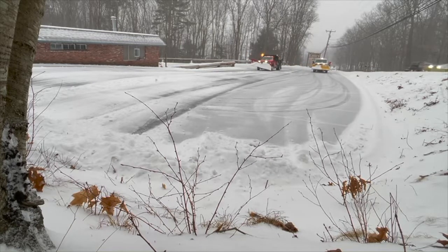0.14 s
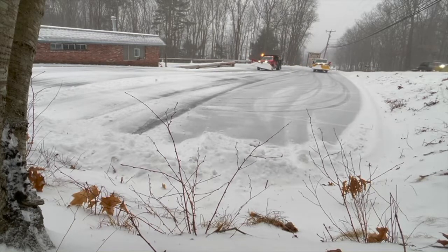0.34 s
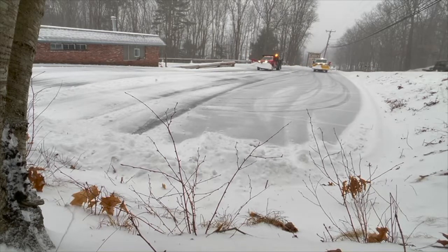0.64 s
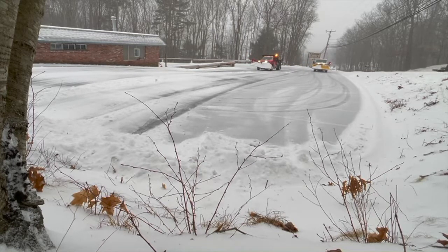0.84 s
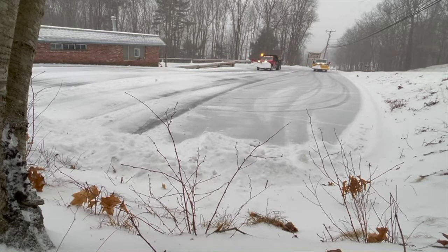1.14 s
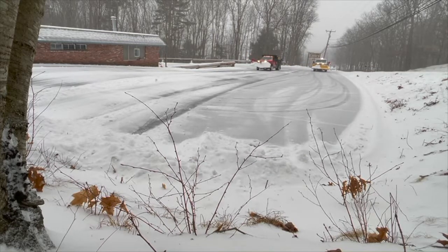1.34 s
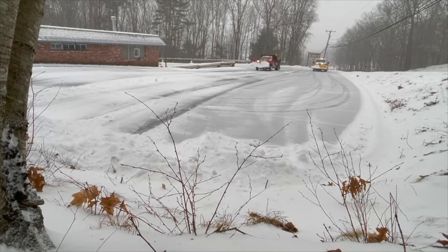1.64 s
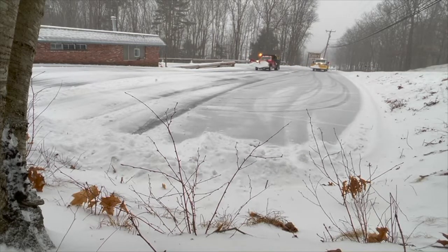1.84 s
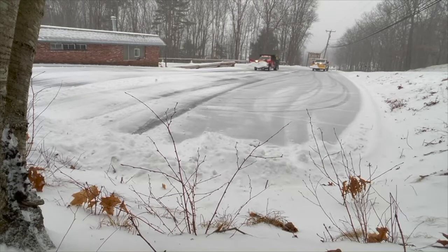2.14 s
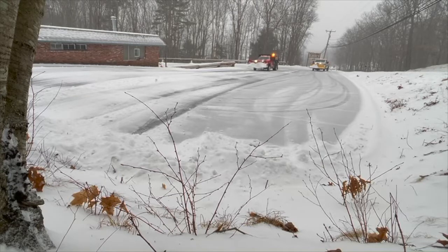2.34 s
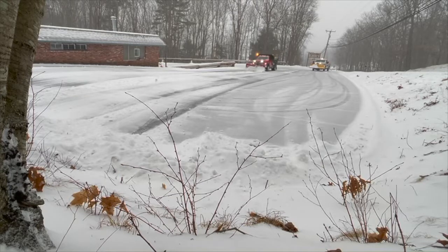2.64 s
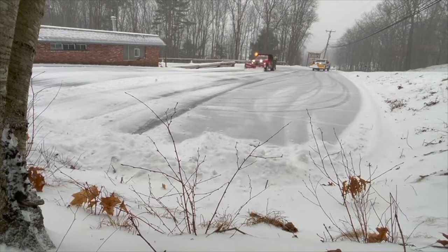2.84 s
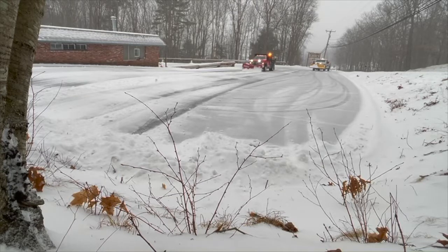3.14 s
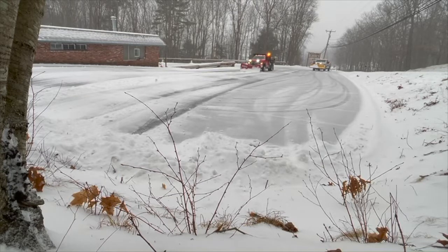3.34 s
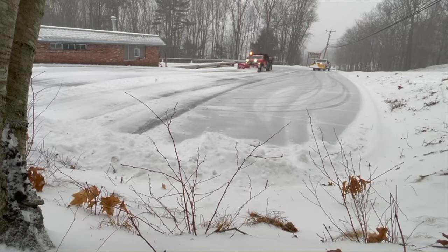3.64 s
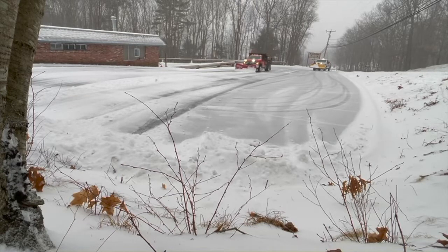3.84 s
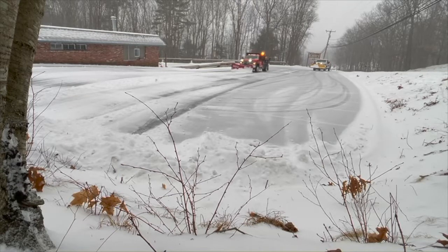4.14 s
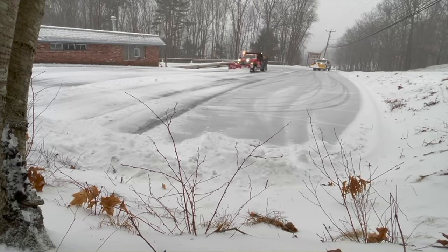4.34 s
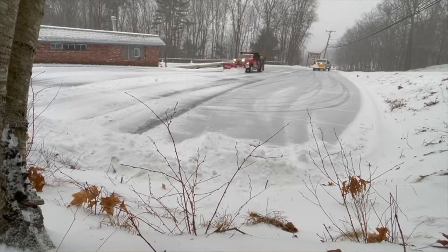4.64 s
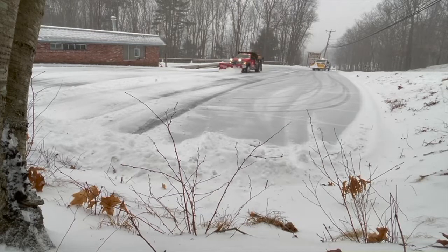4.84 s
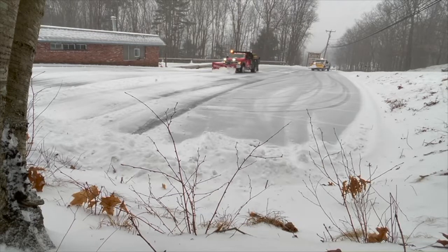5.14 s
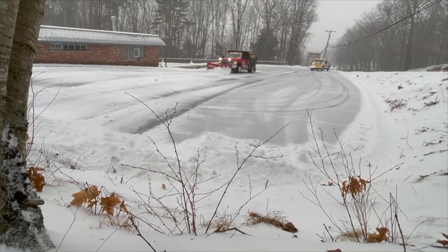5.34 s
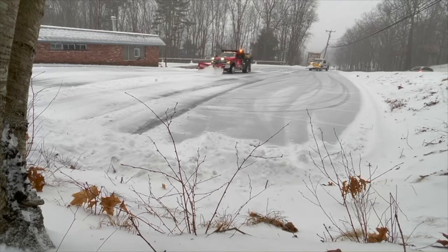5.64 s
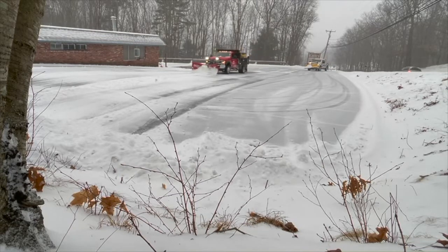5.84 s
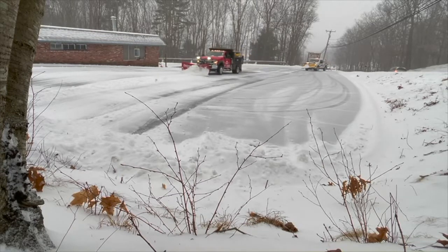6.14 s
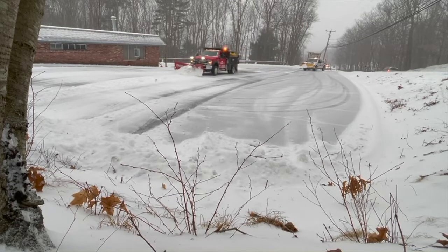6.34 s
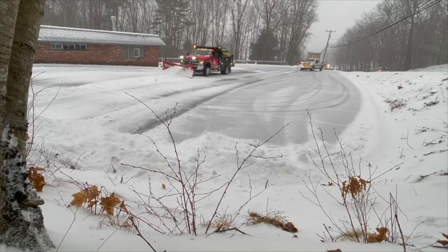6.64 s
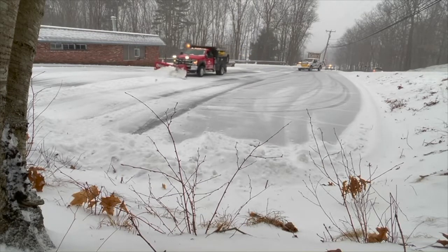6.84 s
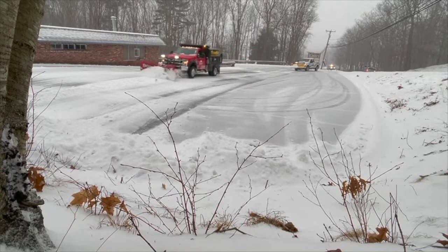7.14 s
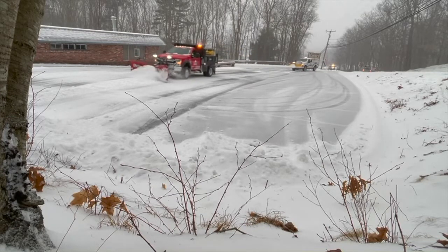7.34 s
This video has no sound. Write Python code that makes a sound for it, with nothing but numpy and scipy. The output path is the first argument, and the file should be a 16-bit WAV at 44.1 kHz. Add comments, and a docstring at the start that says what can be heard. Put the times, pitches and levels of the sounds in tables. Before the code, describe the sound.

Fine icy hiss surrounds the microphone, with irregular crisp ticks left and right and a few dull taps. A big diesel throbs from the start, strongest before a heavy steel bang and bounce just under three seconds in. Then the engine fades slowly into low road rumble and slush wash, as a slowing car's falling hum joins gritty, splashing surges near the end.

```python
"""A stereo microphone stands on a snowy lot with sleet hissing all round and pellets ticking close by.
From the start a plow truck's eight-cylinder diesel drones, swells and sinks: engine-order lines and a wall echo.
A faint hydraulic whine glides by as the blade begins to drag, as noise through ground chatter resonances.
Then the blade bangs down in a burst of blows that ring its modes and draw a short tail from the lot.
Late on, a car slows on the slushy road: a sinking engine line, surges of spray noise, then scraping swells."""
import sys
import numpy as np
from scipy import signal
from scipy.fft import rfft, irfft, next_fast_len
from scipy.io import wavfile
from scipy.ndimage import uniform_filter1d

SR = 44100
rng = np.random.default_rng(int(sys.argv[2]) if len(sys.argv) > 2 else 0)


def int16_out(signal):
    """Quantize to a 16-bit WAV file."""
    q = np.round(np.clip(np.atleast_2d(signal).T, -1, 1) * 32767)
    wavfile.write(sys.argv[1], SR, q.astype(np.int16))


N = 329868
TIME = np.arange(N) / SR

# low rumble of exhausts and vehicle bodies, shared by road and car: [f/Hz, relative level/dB per Hz]
RUMBLE_SPECTRUM = [(20, -26), (30, -20), (42, -18), (70, 2.5), (110, -3.5), (150, -7.5), (200, -7),
                   (260, -16.5), (330, -27.5)]
RUMBLE_WIDE_DB = -14  # opposite share re the common share


def undb(db):
    """Decibels to an amplitude factor."""
    return 10 ** (np.asarray(db) / 20)


def unit(x):
    """Scale to rms 1."""
    return x / np.sqrt(np.mean(x ** 2))


def curves(table):
    """Columns of a table, joined by straight lines in time."""
    s, *columns = np.transpose(table)
    return [np.interp(TIME, s, column) for column in columns]


def walk(rate):
    """Random levels held 1 / rate s and slewed twice; spread near 1."""
    hold = int(SR / rate)
    steps = np.repeat(rng.standard_normal(N // hold + 1), hold)
    return 1.38 * uniform_filter1d(uniform_filter1d(steps, hold), hold)[:N]


def pan(x, db):
    """Place a sound between the ports; db is left minus right."""
    return np.array([x * undb(db / 2), x * undb(-db / 2)])


def wide(common, opposite):
    """Left and right from a part alike at both ports and a part of opposite sign."""
    return np.array([common + opposite, common - opposite])


def ring(x, hz, t60):
    """One decaying mode, struck by x; it falls 60 dB in t60 s."""
    pole = np.exp(2j * np.pi * hz / SR - np.log(1000) / (t60 * SR))
    return signal.lfilter([1], [1, -pole], x).imag


def tone(hz, wobble_db, rate, turn=0.):
    """A sine of rms near 1 whose strength and timing waver."""
    strength = undb(wobble_db * walk(rate))
    turns = np.cumsum(hz) / SR + turn + .012 * wobble_db * walk(rate)
    return np.sqrt(2) * strength * np.sin(2 * np.pi * turns)


def wash(source, spectrum, swell):
    """Colour a source to a spectrum at rms 1; each octave follows its own swell."""
    size = next_fast_len(N)
    octave = np.log2(np.maximum(np.arange(size // 2 + 1) * SR / size, 1))
    hz, db = np.transpose(spectrum)
    bins = rfft(source, size) * undb(np.interp(octave, np.log2(hz), db, left=-200, right=-200))
    total = np.zeros(N)
    for centre in range(int(np.log2(hz[0])), int(np.log2(hz[-1])) + 2):
        window = np.clip(1 - abs(octave - centre), 0, 1)  # overlapping triangles an octave apart
        total += swell(centre) * irfft(bins * window, size)[:N]
    return unit(total)


def roar(spectrum, wide_db, flicker_db, rate):
    """Noise in a spectrum, flickering by octave, with a share that is opposite at the ports."""
    def flicker(centre):
        """An independent wavering gain for one octave."""
        return undb(flicker_db * walk(rate))

    common = wash(rng.standard_normal(N), spectrum, flicker)
    opposite = wash(rng.standard_normal(N), spectrum, flicker)
    return wide(common, undb(wide_db) * opposite)


def grains(rate, spread_db, decay_s):
    """Envelope of scattered hits of very unequal size, coming in flurries."""
    hits = rng.random(N) < rate / SR * undb(2.5 * walk(8))
    size = undb(spread_db * np.minimum(rng.exponential(size=N), 3.1))
    pole = np.exp(-1 / (decay_s * SR))
    return signal.lfilter([np.e * (1 - pole)], [1, -2 * pole, pole ** 2], hits * size)


def truck():
    """Locked lines on the orders of the engine cycle beat with their echo; the ports hear them slightly apart."""
    # diesel as it nears and leaves: [t/s, four-stroke cycle f/Hz, firing line level/dB,
    # exhaust-pipe line level/dB, other orders' reference level/dB, right port ahead/ms]
    engine = [(0, 14.33, -24.5, -29, -38, .42), (.7, 14.29, -23.3, -26.5, -35.5, .58),
              (1.02, 14.36, -22, -25.3, -35.7, .58), (1.36, 14.56, -21.2, -25.5, -34.5, .6),
              (2.3, 14.76, -18.3, -25, -33.2, .63), (2.75, 14.77, -19.6, -20, -32.8, .63),
              (3.15, 14.77, -19.8, -22.3, -33, .63), (3.75, 14.57, -20.2, -24, -33.1, .66),
              (4.3, 14.47, -21.3, -26.8, -33.1, .66), (4.8, 14.46, -22.2, -28.5, -32, .33),
              (5.4, 14.42, -25.1, -33.2, -35.5, .18), (6, 14.35, -26.4, -33.2, -35.2, .04),
              (6.8, 14.35, -28, -34, -36.4, -.1), (7.48, 14.48, -29, -36.7, -39, -.11)]
    # wall echo re the direct sound: [t/s, firing line level/dB, exhaust-pipe line level/dB]
    echo = [(0, -8, -17), (1.301, -13, -5), (2.4, -26, -7), (2.8, -25, -47), (7.48, -60, -40)]
    # lines from unequal cylinders: [multiple of the cycle f]
    uneven_orders = [3, 4, 6, 7, 9, 10, 11, 12, 13, 14, 16]
    # their strengths: [level/dB re the other orders' reference]
    uneven_levels = [-12.5, -15, -7.5, -3.5, -18, -13.5, -18, -20, -15, -23, -25]
    firing_order, pipe_order = 8, 5
    # the echo travels this much farther, and the detour grows as the truck gathers way
    detour_m, detour_m_s, detour_m_s2 = 14.92, 4.29, 1.75

    cycle, firing_db, pipe_db, other_db, ahead_ms = curves(engine)
    firing = undb(firing_db) * tone(firing_order * cycle, .5, 12)
    pipe = undb(pipe_db) * tone(pipe_order * cycle, .8, 10)
    detour = detour_m + detour_m_s * TIME + detour_m_s2 * TIME ** 2 / 2
    sent = TIME - detour / 343  # when the echo now heard left the truck; sound travels 343 m/s
    sound = np.zeros(N)
    for line, echo_db in zip((firing, pipe), curves(echo)):
        sound += line + (sent > 0) * undb(echo_db) * np.interp(sent, TIME, line)
    for order, db in zip(uneven_orders, uneven_levels):
        sound += undb(other_db + db) * tone(order * cycle, 2.3, 5, rng.random())
    left = np.interp(TIME - ahead_ms / 1000, TIME, sound)
    return np.array([undb(-.5) * left, sound])


def blade():
    """The blade chatters as it drags, then slams and bounces; the lot answers with a short wide tail."""
    bang = blade_bang()
    return blade_drag() + pan(bang, -2.0) + lot_tail(bang)


def blade_drag():
    """Noise of the slipping edge excites broad resonances of blade on ground."""
    # blade chatter on the ground: [f/Hz, nominal width/Hz, relative level/dB]
    chatter = [(730, 47, -1), (1010, 87, -0.5), (1110, 42, 0.5)]
    from_s, to_s, edge_s = 0.59, 2.52, 0.11
    start_db, rise_db_s = -57.5, 2  # excitation level and its rise per second

    down = np.clip(np.minimum(TIME - from_s, to_s - TIME) / edge_s, 0, 1)
    slip_db = start_db + rise_db_s * (TIME - from_s) + 1.9 * walk(29.96)
    slip = rng.standard_normal((2, N)) * down * undb(slip_db)
    drag = np.zeros((2, N))
    for hz, width, db in chatter:
        evened = np.sqrt(width / SR) * 2.67  # offsets the stronger build-up of narrow modes
        drag += undb(db) * ring(slip, hz, 2.7 / width) * evened
    return drag


def blade_bang():
    """Each blow pushes the steel and rattles loose parts, ringing blade modes and brief clanks."""
    # blade blows: [t/s, level/dB, rattle time constant/ms, pitch favoured by the struck spot f/Hz,
    # clank level/dB before the common clank trim]
    blows = [(2.672, -25, 5.1, 400, -20), (2.6804, -15, 2.7, 273, -20), (2.6835, -7, 4.6, 273, -19.5),
             (2.694, -18.5, 5, 470, -17), (2.699, -12.5, 6.1, 203, -20), (2.707, -5, 3.8, 130, -20),
             (2.712, -14, 4.6, 433, -18), (2.7189, -12.5, 3, 190, -16), (2.736, -23, 4.3, 560, -27),
             (2.748, -26, 5.4, 520, -25), (2.769, -29, 7.5, 550, -29), (2.811, -20.5, 2.6, 297, -34),
             (2.819, -28.5, 4.9, 704, -32), (2.845, -38, 8, 600, -36), (2.882, -36, 8, 500, -36),
             (2.92, -38, 6.5, 750, -36)]
    # blade and frame modes: [f/Hz, relative level/dB, t60/s]
    steel_modes = [(94, -5, 0.4), (152, -8, 0.052), (198, 1, 0.069), (266, -1, 0.082), (288, 1, 0.033),
                   (351, -3, 0.042), (427, -3.5, 0.087), (478, 0, 0.041), (551, -5, 0.09),
                   (607, -1.5, 0.02), (696, -3, 0.1), (751, -3, 0.065), (920, -3.5, 0.078),
                   (990, -7.5, .08), (1160, -21, .04), (1430, -19, .03)]
    # pins and chain links: [f/Hz, relative level/dB, t60/s]
    link_modes = [(1750, -8, .008), (2200, -4, .008), (2700, -1, .011), (3300, -5, .007), (3840, -5, .009),
                  (4220, -3, .011), (4900, -4, .008), (6020, -9, .007)]
    spot_db, clank_trim_db = 8, -16  # mode fall per octave from the favoured pitch; trim of all clanks

    bang, t = np.zeros(N), np.arange(SR // 4) / SR
    soft = signal.butter(3, 1650, fs=SR, output="sos")
    noises = rng.standard_normal((len(blows), len(t)))
    for (s, blow_db, rattle_ms, spot_hz, clank_db), noise in zip(blows, noises):
        # a firm push, longer for a deeper spot, then loose pins and chains rattle
        firm = t * np.exp(-t * spot_hz / .11)
        loose = t * np.exp(-t / (rattle_ms / 1000)) * noise
        loose = loose / np.sqrt(np.sum(loose ** 2))
        push = 0.25 * loose - firm / firm.sum()
        body, clank = np.zeros(len(t)), np.zeros(len(t))
        for hz, db, t60 in steel_modes:
            favoured_db = db - spot_db * abs(np.log2(hz / spot_hz))
            body += undb(favoured_db) * ring(push, hz, t60)
        for hz, db, t60 in link_modes:
            clank += undb(db) * ring(loose, hz, t60)
        blow = undb(blow_db) * signal.sosfilt(soft, body) + undb(clank_trim_db + clank_db) * clank
        bang[int(s * SR):][:len(t)] += blow
    return signal.sosfilt(signal.butter(2, 60, "highpass", fs=SR, output="sos"), bang)


def lot_tail(bang):
    """The lot scatters the bang: decaying noise, independent at each port, convolved with it."""
    level_db, t60_s, onset_s = -39, 0.43, 0.013
    t = np.arange(SR // 2) / SR
    lot = rng.standard_normal((2, len(t))) * undb(-60 * t / t60_s) * np.clip(t / onset_s, 0, 1)
    return undb(level_db) * signal.fftconvolve(bang[None], lot, axes=1)[:, :N]


def hydraulics():
    """A thin gliding whine from the side: one pitch with a phase offset between the ports."""
    # hydraulic whine: [t/s, f/Hz, level/dB]
    whine = [(.1, 500, -63), (.33, 708, -62), (.5, 805, -67), (.6, 826, -70), (.65, 832, -59),
             (.82, 830, -61), (.88, 830, -70), (.93, 830, -57), (1.05, 828, -55.5), (1.27, 822, -55.5),
             (1.32, 820, -63)]
    hz, db = curves(whine)
    on = (TIME > whine[0][0]) & (TIME < whine[-1][0])
    return on * undb(db) * np.array([tone(hz, 1.5, 20), tone(hz, 1.5, 20, .15)])


def pellets():
    """Pellets hitting close by: millisecond crackles and duller thuds on the microphone's housing."""
    out = np.zeros((2, N + 2000))
    add_ticks(out)
    add_thuds(out)
    return out[:, :N]


def add_ticks(out):
    """Each hit is a brief burst of noise with its own colour and a faint blur before and after."""
    # close ice pellets: [t/s, reference peak level/dB, brightest f/Hz,
    # left minus right level/dB before each band's share]
    ticks = [(0.181, -34, 6900, -4), (0.463, -18, 7840, -4), (0.467, -18, 4260, 4), (0.48, -24, 6700, 3),
             (0.508, -24, 9500, 2), (0.732, -30, 7300, -8), (0.7544, -24, 7340, 15), (0.791, -30, 6900, -2),
             (0.7955, -24.5, 5230, 22), (0.7965, -21, 8200, 23), (0.8542, -25, 10000, -8),
             (0.9803, -22.5, 6200, 12), (1.2085, -24, 8150, 0), (1.3356, -28.5, 3050, 14),
             (1.73, -28, 6700, 4), (1.919, -25, 11400, 1), (1.9356, -27, 7600, 7), (1.941, -24.5, 5530, 5),
             (2.1458, -30, 8340, -12), (2.1672, -26, 6150, -7), (2.3188, -25, 10300, 2),
             (2.3474, -29, 6600, -2), (2.3673, -31.5, 5700, 16), (2.3801, -25, 10000, 3),
             (2.4525, -34, 6400, -6), (2.9257, -30.5, 8200, 10), (3.1598, -26, 7600, -8),
             (3.1841, -27.5, 7200, -3), (3.219, -27, 7600, 1), (3.4524, -29.5, 8700, -7),
             (3.534, -23.5, 6500, 6), (3.56, -34, 8100, 0), (3.6101, -34, 7800, -11),
             (3.6197, -29, 3200, 9), (3.62, -32, 9000, 0), (3.6552, -30.5, 2800, 2), (3.6553, -23, 5400, 5),
             (3.95, -29, 7800, -3), (4.188, -29.5, 6200, 2), (4.688, -26, 2330, -2),
             (4.8389, -28, 8200, -6), (5.141, -27.5, 9000, -8), (5.18, -28, 6400, 0),
             (5.2522, -25.5, 6600, -14), (5.4514, -25, 10200, 0), (5.546, -27.5, 4600, 6),
             (5.685, -28.5, 5200, 17), (6.0524, -24, 10500, -2), (6.0547, -29, 4600, 0),
             (6.0594, -25, 7800, -2), (6.227, -32, 5400, 3), (6.4853, -28, 7100, -3),
             (6.7472, -23, 6900, 8), (6.8303, -25.5, 8100, -3), (6.9311, -31, 6190, -2),
             (7.0581, -27, 5900, 8), (7.1705, -15.5, 12400, 0), (7.171, -28, 2300, 0),
             (7.3145, -20.5, 8300, 15), (7.3223, -26, 8400, 5), (7.35, -27, 10700, 1),
             (7.3514, -28, 2700, 3), (7.392, -22, 11300, 3), (7.4544, -36, 7500, -13)]
    # bands that make up a tick: [low edge f/Hz, high edge f/Hz]
    tick_bands = [(1500, 2300), (2300, 3300), (3300, 4600), (4600, 6200), (6200, 7600), (7600, 9600),
                  (10300, 14000)]
    below_db, above_db = 16, 11  # fall per octave below, per squared octave above the brightest pitch
    most_below_db, most_above_db = 17.5, 27  # limits of those falls
    share_db, patchy_db = 2.5, 7.5  # cut of each band under 10 kHz; random hollows off the brightest pitch
    spreads = (0.61, 0.35, 0.49, 0.84, 1.0, 0.89, 0.55)  # opposite noise in each band
    pan_shares = (0.35, 0.45, 1.0, 0.89, 0.27, 0.72, .2)  # the highest band is most alike in level

    t, lead = np.arange(2000) / SR, .012  # s; the lead leaves room for the blur ahead of the hit
    shape = np.exp(-((t - lead) / .0007) ** 2) + .12 * np.exp(-abs(t - lead) / .004)
    filters = [signal.butter(2, band, "bandpass", fs=SR, output="sos") for band in tick_bands]
    centres = np.mean(tick_bands, 1)
    crackle = rng.standard_normal((len(ticks), 2, len(t)))
    patchy = rng.standard_normal((len(ticks), len(filters)))
    for (s, peak_db, hz, pan_db), (common, opposite), patch in zip(ticks, crackle, patchy):
        octaves = np.log2(centres / hz)
        fall_below = np.minimum(-below_db * octaves, most_below_db)
        fall_above = np.minimum(above_db * octaves ** 2, most_above_db)
        fall = np.where(octaves < 0, fall_below, fall_above)
        hollow = patchy_db * abs(patch) * np.minimum(abs(octaves) * 4, 1)
        band_db = peak_db - share_db * (centres < 10000) - hollow - fall
        for sos, db, spread, pan_share in zip(filters, band_db, spreads, pan_shares):
            tick = signal.sosfiltfilt(sos, wide(common, spread * opposite) * shape)
            tick = tick / abs(tick).max(1, keepdims=True)
            tick = tick * undb(pan_share * np.array([[pan_db], [-pan_db]]) / 2)
            out[:, int((s - lead) * SR):][:, :len(t)] += undb(db) * tick


def add_thuds(out):
    """A pellet on the housing gives a short low sine, quick to rise and soon damped."""
    # pellets on the microphone's housing: [t/s, peak level before panning/dB, f/Hz, left minus right level/dB]
    housing_hits = [(0.463, -41, 700, 23), (0.784, -38, 620, 9), (0.919, -29, 400, 5),
                    (0.982, -28.5, 270, 23)]
    t = np.arange(2000) / SR
    for s, db, hz, pan_db in housing_hits:
        thud = np.sin(2 * np.pi * hz * t) * np.exp(-t * hz / 0.17) * (1 - np.exp(-t * hz / 0.54))
        out[:, int(s * SR):][:, :len(t)] += pan(undb(db) * thud / abs(thud).max(), pan_db)


def car():
    """The firing line sinks as the car slows, with surges of spray and late swells of scraping noise near 950 Hz."""
    # slowing car engine: [t/s, firing f/Hz, firing line level/dB]
    slowing = [(5.1, 73, -52), (5.35, 71.67, -35), (5.75, 69.96, -33), (6.1, 64.5, -31.5), (6.3, 61.3, -34),
               (7.0, 55.05, -36), (7.25, 51.2, -37), (7.48, 49.2, -48)]
    # surges of spray, and late swells of scraping noise: [t/s, spray level/dB, dying away/s, scrape level/dB]
    surges = [(5.40, -37, 0.28, -56), (5.49, -41, 0.14, -49), (5.61, -44, 0.37, -60),
              (5.80, -36.5, 0.16, -46), (5.88, -50, 0.12, -41.5), (5.97, -52, 0.14, -43),
              (6.15, -50, 0.17, -45), (6.28, -46, 0.13, -46), (6.5, -62, 0.28, -49.5),
              (6.87, -49, .3, -48.5), (7.24, -56, 0.21, -46)]
    # colour of the spray: [f/Hz, relative level/dB per Hz]
    spray_spectrum = [(200, -28), (330, 14), (600, 4.5), (1500, -22), (2600, -34)]
    # colour of the scraping noise: [f/Hz, relative level/dB per Hz]
    scrape_spectrum = [(700, -22), (880, -2), (950, 11.5), (1030, 2), (1300, 4), (1700, -1.5), (2100, -22)]
    rise_s, thump_db, upper_db = 0.035, 8, -9  # thump re spray; upper engine line re firing line

    hz, db = curves(slowing)
    upper = undb(upper_db) * tone(hz * 3 / 2, 3.1, 3.34)  # half again as high as the firing line
    engine = undb(db) * (tone(hz, 1.4, 9) + upper)
    s, spray_db, decay_s, scrape_db = np.transpose(surges)[:, :, None]
    age = np.maximum(TIME - s, 0)
    shape = (1 - np.exp(-age / rise_s)) * np.exp(-age / decay_s)
    # overlapping surges add in power
    spray = np.sqrt(np.sum((undb(spray_db) * shape) ** 2, 0))
    scrape = np.sqrt(np.sum((undb(scrape_db) * shape) ** 2, 0))
    spatter = unit(1 + 0.56 * grains(120, 3.5, 0.0047)) * roar(spray_spectrum, -24, 1.2, 45)
    thump = undb(thump_db) * roar(RUMBLE_SPECTRUM, RUMBLE_WIDE_DB, 0.52, 4.1)
    scraping = unit(1 + 0.65 * grains(250, 2.8, 0.0022)) * roar(scrape_spectrum, -4, 1.9, 60)
    return pan(engine, -0.47) + spray * (spatter + thump) + scrape * scraping


def road():
    """Rumble is almost alike at both ports; grinding and slush spray spread wider."""
    # road roar: [t/s, exhaust and body rumble level/dB, grinding level/dB, tyres in slush level/dB]
    roar_levels = [(0, -35.5, -51.5, -55), (.42, -39.5, -57.5, -58.5), (.92, -37, -49.5, -55),
                   (1.54, -37, -56.5, -56.5), (2.15, -32, -49, -52.5), (2.62, -37, -52, -54),
                   (2.9, -31.5, -46.5, -51), (3.29, -34.5, -48, -52.5), (3.71, -31, -45.5, -52.5),
                   (4.05, -42, -49, -50.5), (4.56, -38, -48.5, -49), (5.15, -36.5, -46.5, -46.5),
                   (5.5, -36.5, -45.5, -45), (5.96, -31, -45, -45), (6.3, -33, -46, -46),
                   (6.7, -32, -47.5, -50), (7.05, -35.5, -47, -47.5), (7.48, -34.5, -46, -52.5)]
    # colour of the grinding: [f/Hz, relative level/dB per Hz]
    grind_spectrum = [(200, -26), (270, 0.5), (400, 1), (550, -6.5), (800, -4), (1100, -14.5), (1500, -42)]
    # colour of tyres in slush: [f/Hz, relative level/dB per Hz]
    slush_spectrum = [(500, -1.5), (800, 1), (1300, -0.5), (2000, -4.5), (3000, -7), (4500, -16)]

    rumble_db, grind_db, slush_db = curves(roar_levels)
    rumble = undb(rumble_db) * roar(RUMBLE_SPECTRUM, RUMBLE_WIDE_DB, 1.0, 4.3)
    grind = undb(grind_db) * roar(grind_spectrum, -7, 1, 22)
    slush = undb(slush_db) * roar(slush_spectrum, -0.7, 1.0, 17)
    return rumble + grind + slush


def sleet():
    """Far pellets blur to hiss; nearer ones stand out as millisecond grains, some broad, some in part of the band."""
    # hiss common to both ports: [f/Hz, relative level/dB per Hz]
    common_spectrum = [(1200, -40), (2220, -2), (3500, -3.5), (5100, 1.6), (5600, -5.5), (6100, 2.5),
                       (7000, 3), (7500, -4.5), (8000, 3), (9000, 0.5), (10600, -8.5), (12900, -5),
                       (13800, -17), (15700, -23)]
    # hiss opposite at the ports: [f/Hz, relative level/dB per Hz]
    opposite_spectrum = [(880, -17), (1500, -20), (2400, -19.5), (6090, -11.5), (6840, -13), (7420, -23),
                         (7770, -10), (8270, -6.5), (11300, -22.5), (12000, -21), (13000, -76)]
    common_db, wide_db = -48, 0.7  # opposite hiss is given re the common hiss

    broad = grains(110, 5.8, 0.0011)
    flurry = undb(1.1 * walk(18))
    swells = []
    for _ in range(3):
        narrow = grains(120, 3.5, 0.0013)
        near = np.sqrt(1 + (0.15 * broad) ** 2 + (0.56 * narrow) ** 2)
        swells.append(flurry * undb(0.89 * walk(14)) * near)

    def swell(centre):
        """Octaves take the three swells in turn."""
        return swells[centre % 3]

    common = wash(rng.standard_normal(N), common_spectrum, swell)
    opposite = wash(rng.standard_normal(N), opposite_spectrum, swell)
    leaning = undb([[.6], [-.6]])  # a little stronger on the left
    return undb(common_db) * wide(common, undb(wide_db) * opposite) * leaning


def scene():
    """The truck and its blade, close pellets, the car, and the road and sleet behind."""
    return truck() + blade() + hydraulics() + pellets() + car() + road() + sleet()


def record(dry):
    """High-pass at 33 Hz and low-pass at 15.7 kHz over the whole scene."""
    dry = signal.sosfilt(signal.butter(3, 33, "highpass", fs=SR, output="sos"), dry)
    top_hz = 15700
    return signal.sosfilt(signal.ellip(10, .2, 80, top_hz, fs=SR, output="sos"), dry)


dry = scene()
out = record(dry)
int16_out(out)
```